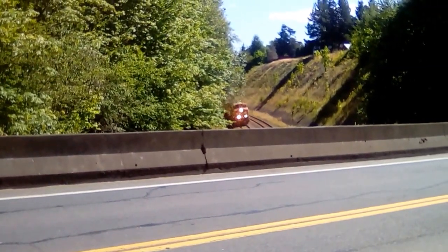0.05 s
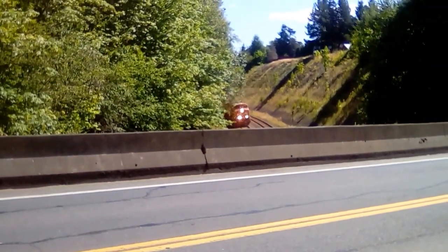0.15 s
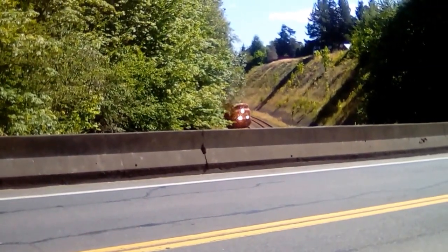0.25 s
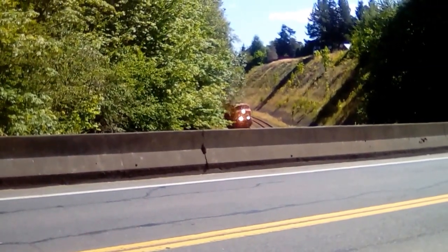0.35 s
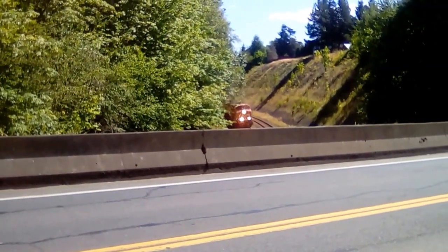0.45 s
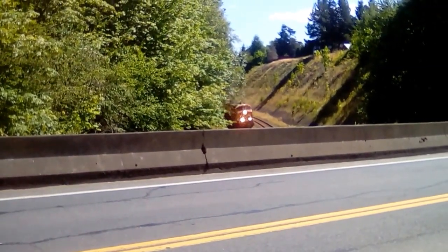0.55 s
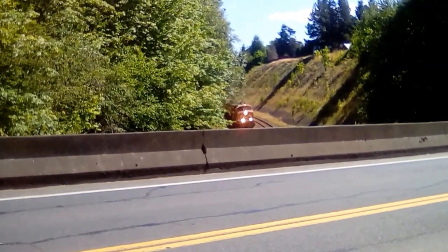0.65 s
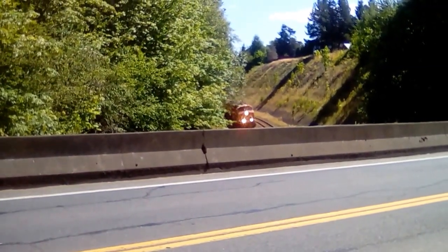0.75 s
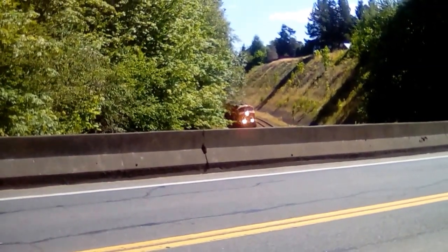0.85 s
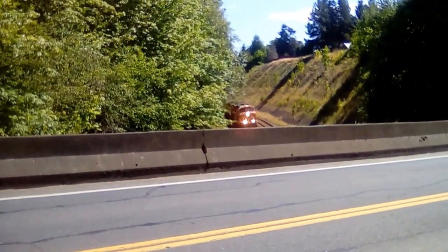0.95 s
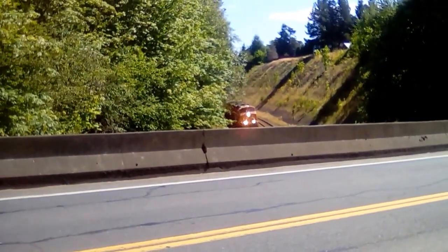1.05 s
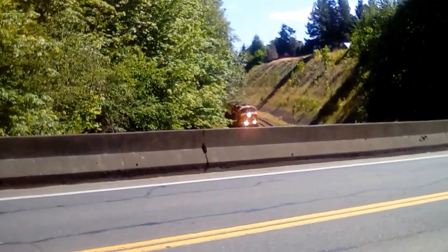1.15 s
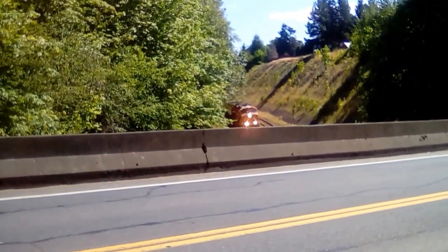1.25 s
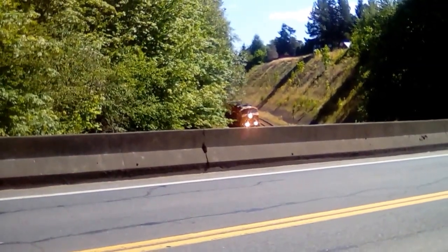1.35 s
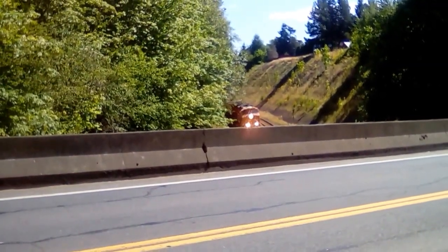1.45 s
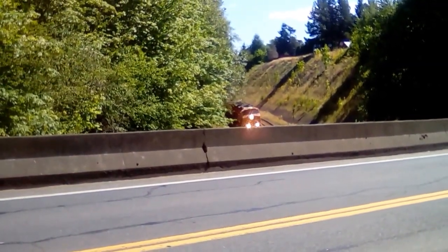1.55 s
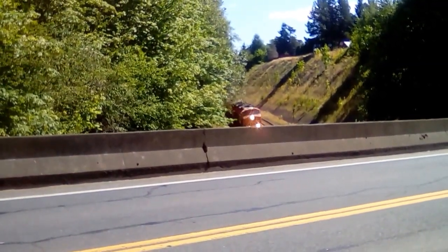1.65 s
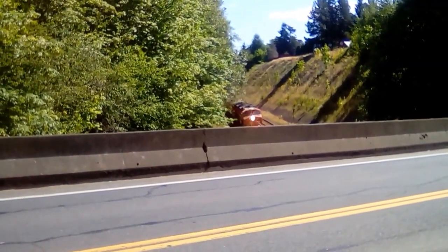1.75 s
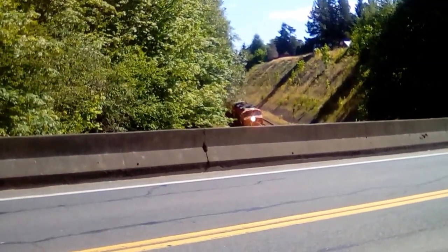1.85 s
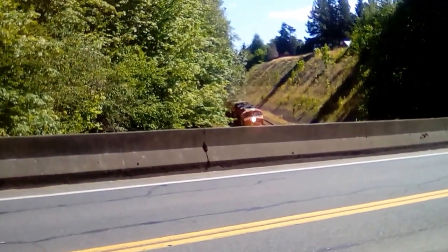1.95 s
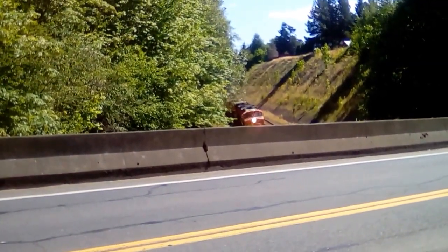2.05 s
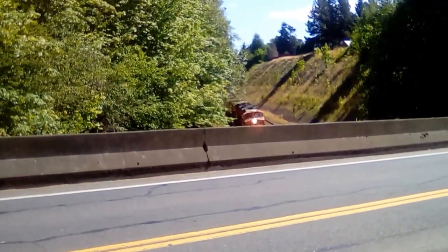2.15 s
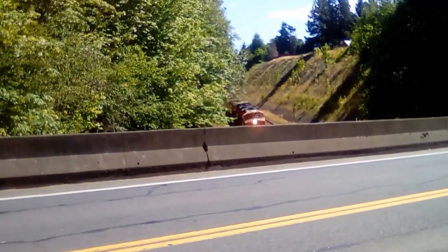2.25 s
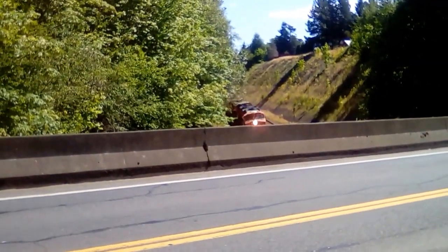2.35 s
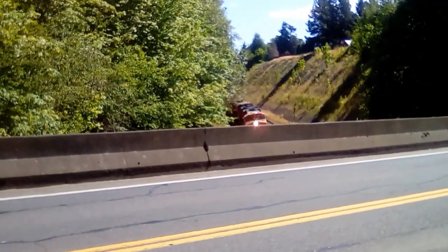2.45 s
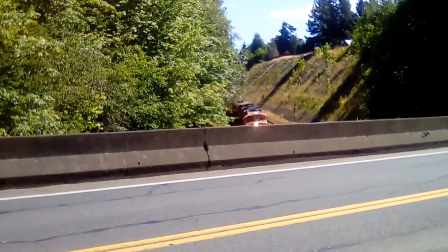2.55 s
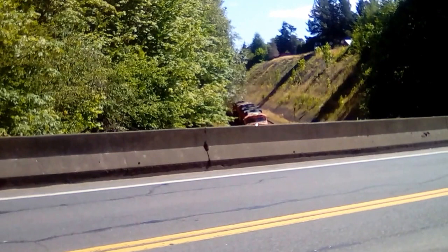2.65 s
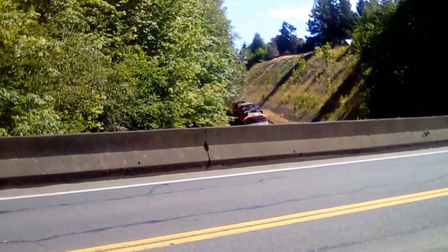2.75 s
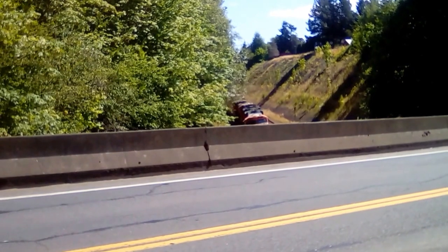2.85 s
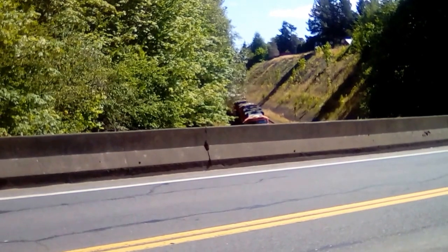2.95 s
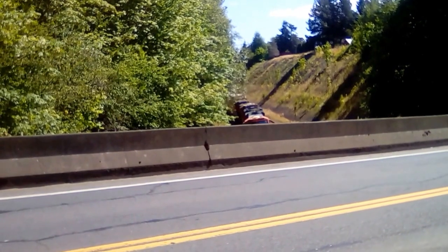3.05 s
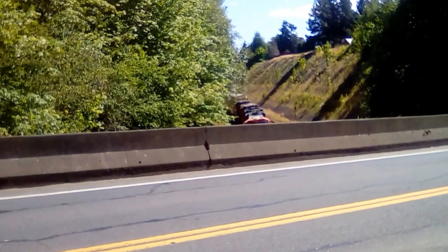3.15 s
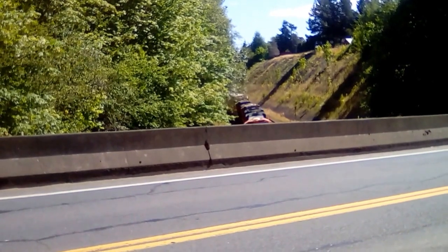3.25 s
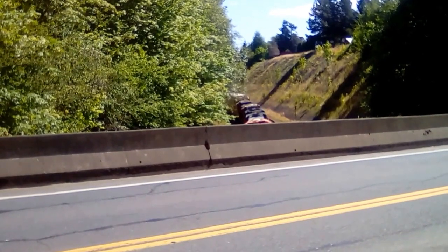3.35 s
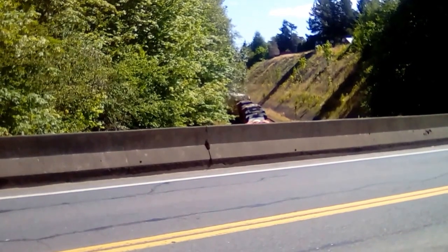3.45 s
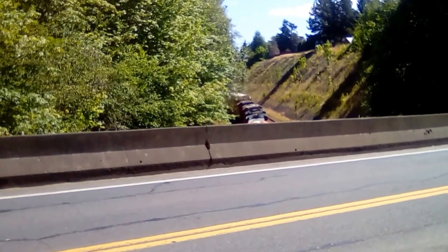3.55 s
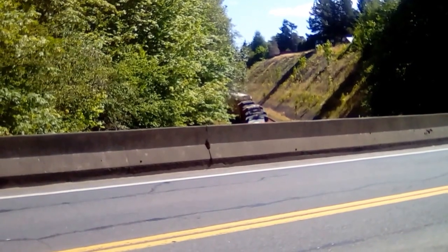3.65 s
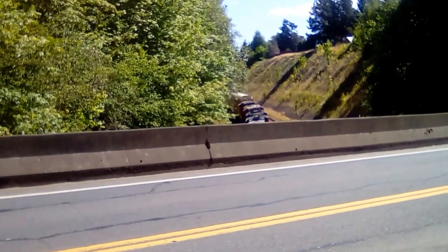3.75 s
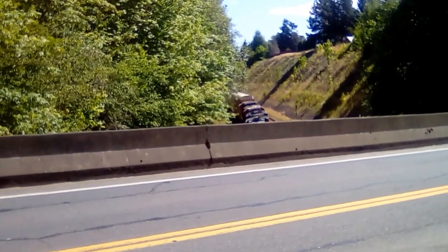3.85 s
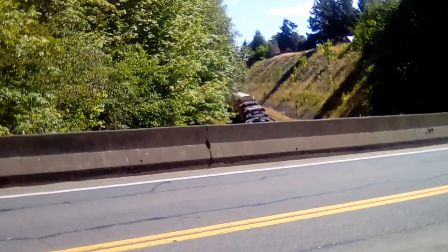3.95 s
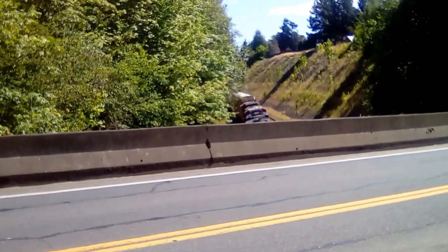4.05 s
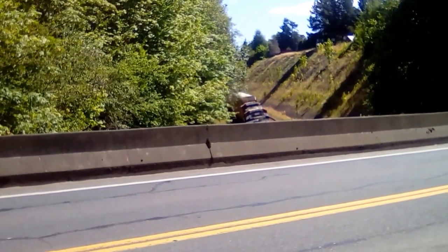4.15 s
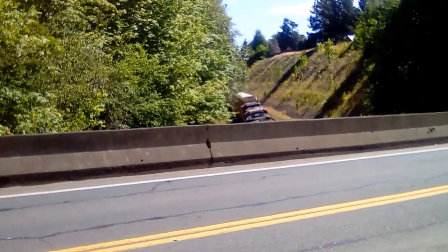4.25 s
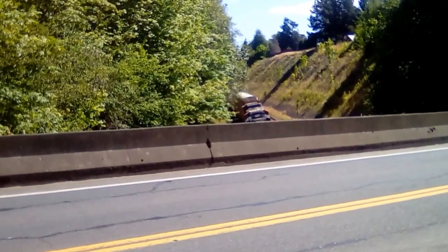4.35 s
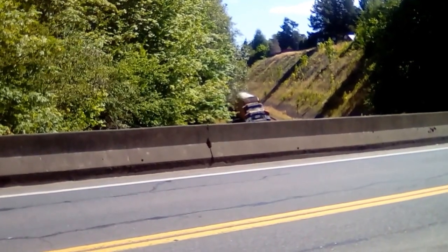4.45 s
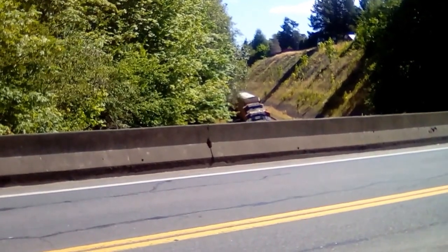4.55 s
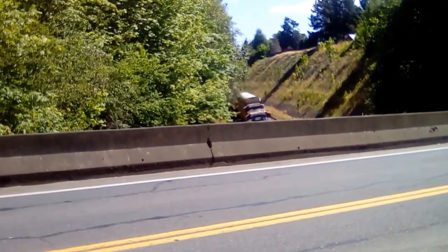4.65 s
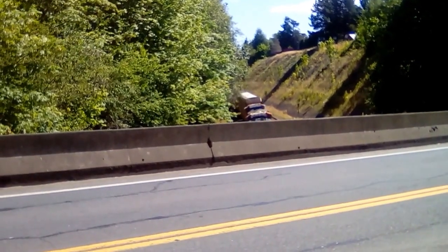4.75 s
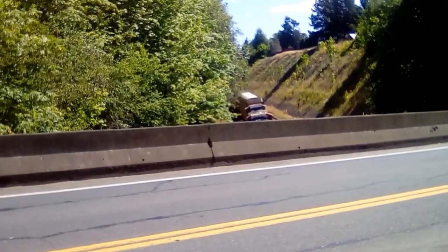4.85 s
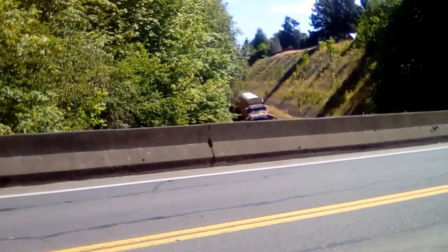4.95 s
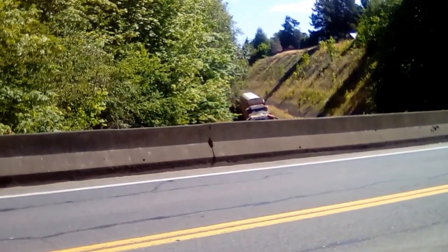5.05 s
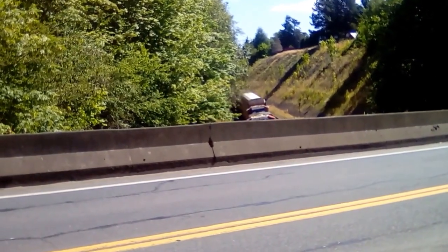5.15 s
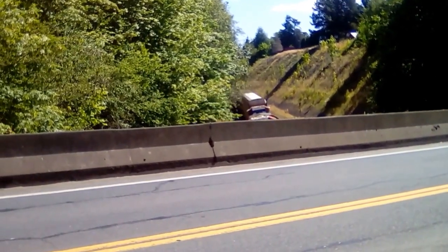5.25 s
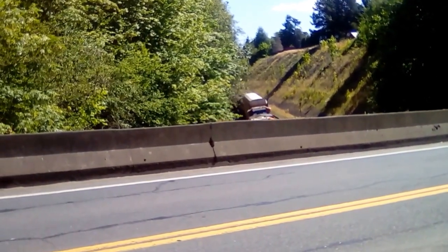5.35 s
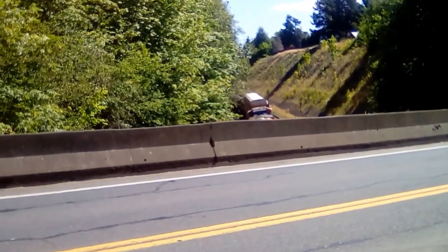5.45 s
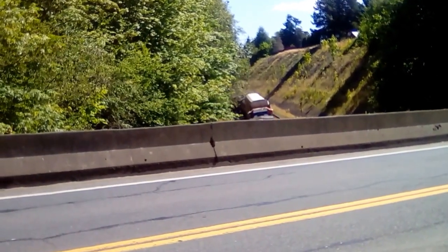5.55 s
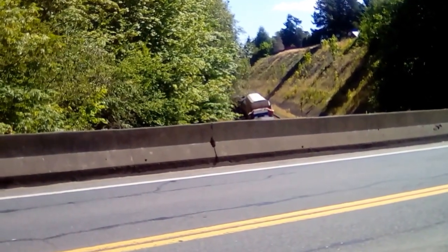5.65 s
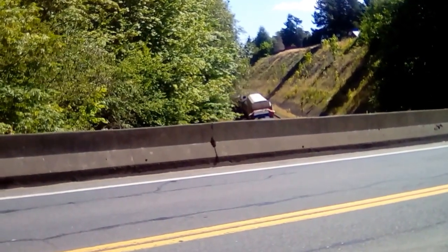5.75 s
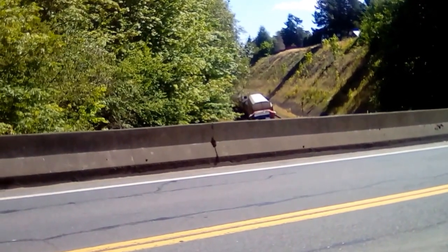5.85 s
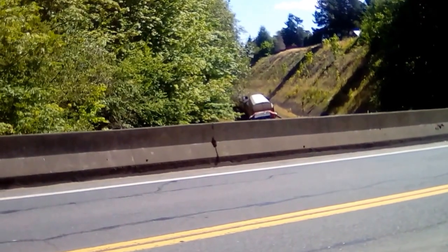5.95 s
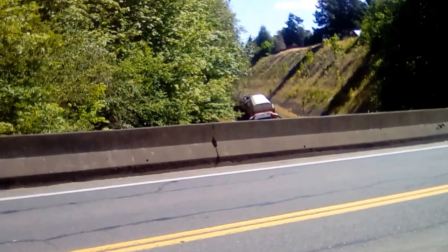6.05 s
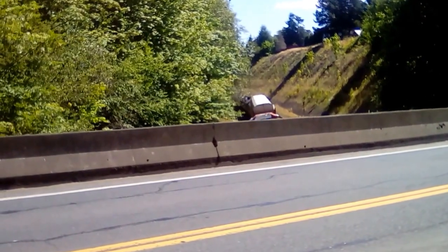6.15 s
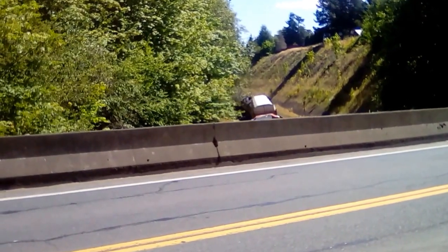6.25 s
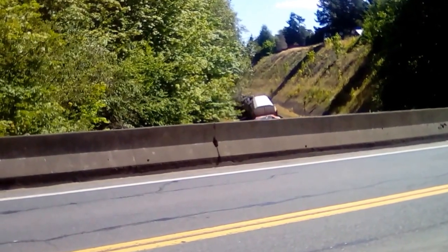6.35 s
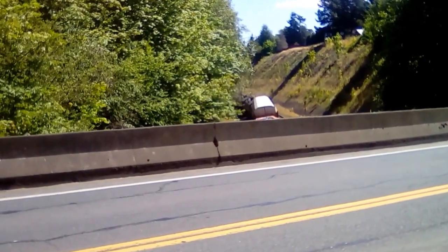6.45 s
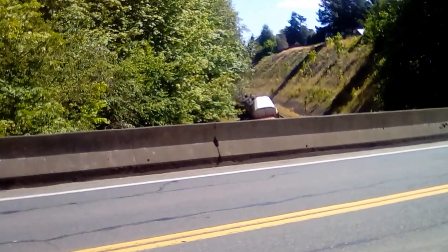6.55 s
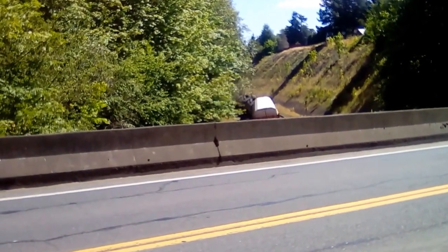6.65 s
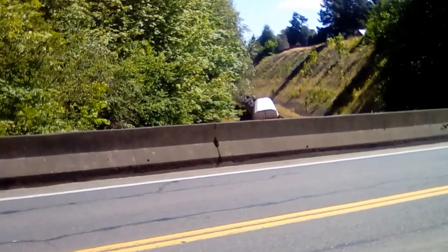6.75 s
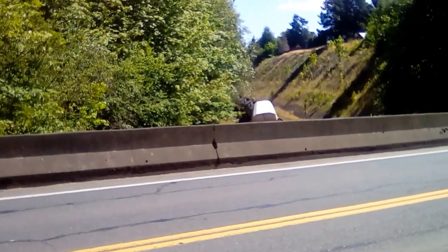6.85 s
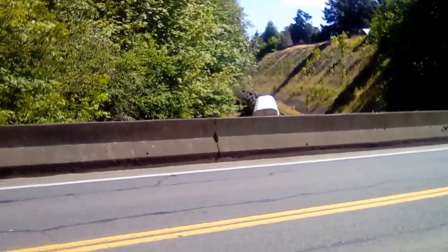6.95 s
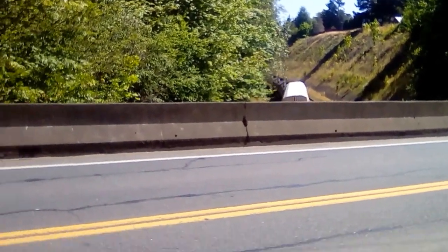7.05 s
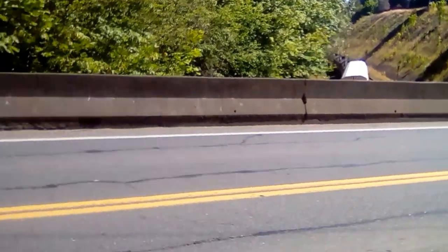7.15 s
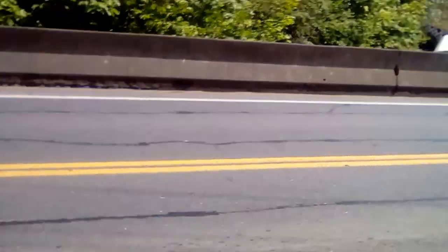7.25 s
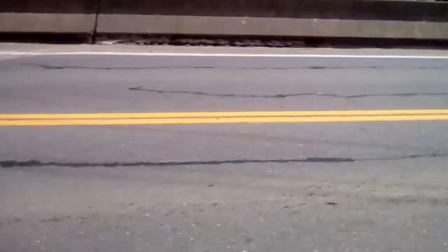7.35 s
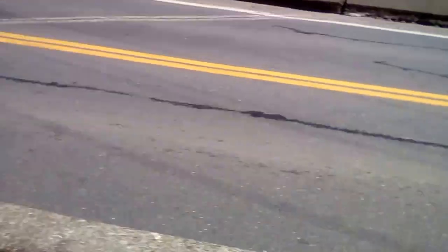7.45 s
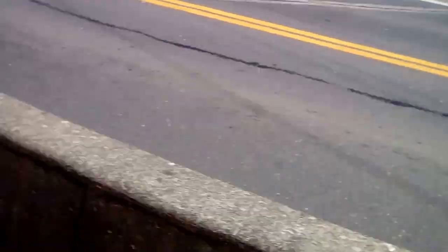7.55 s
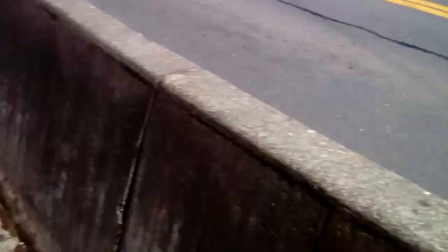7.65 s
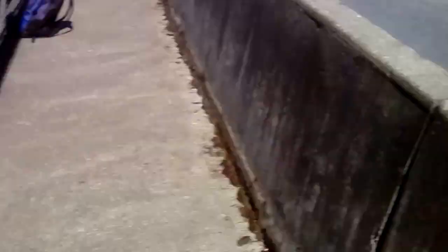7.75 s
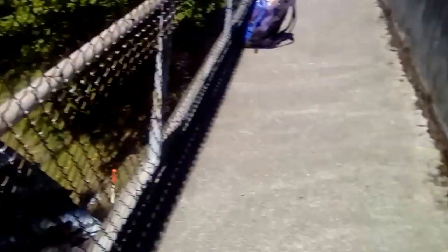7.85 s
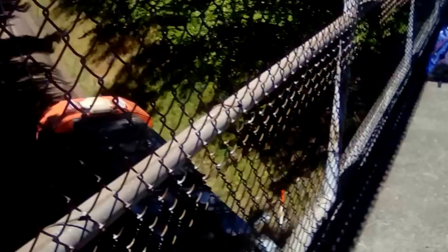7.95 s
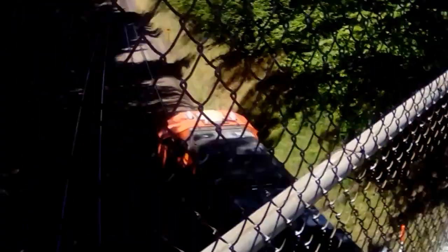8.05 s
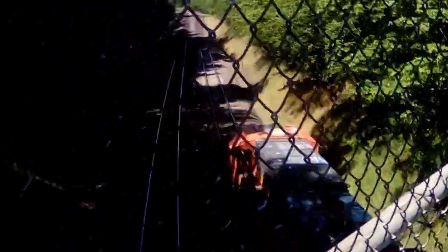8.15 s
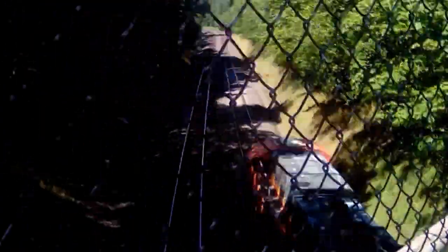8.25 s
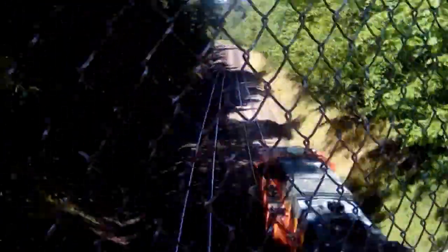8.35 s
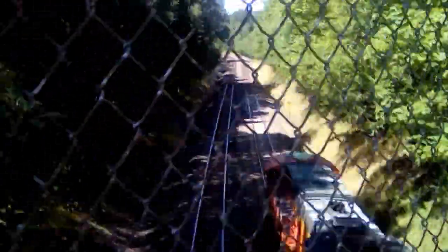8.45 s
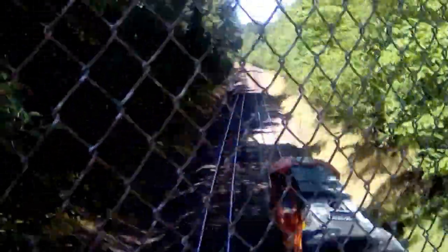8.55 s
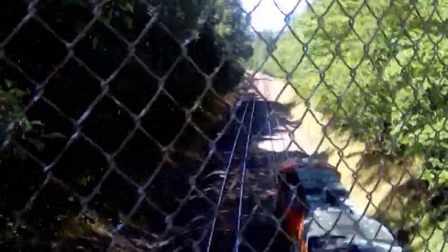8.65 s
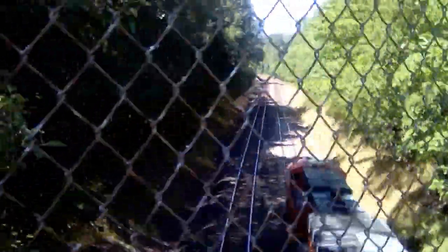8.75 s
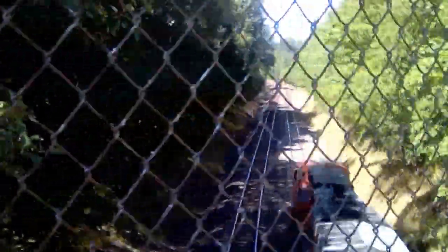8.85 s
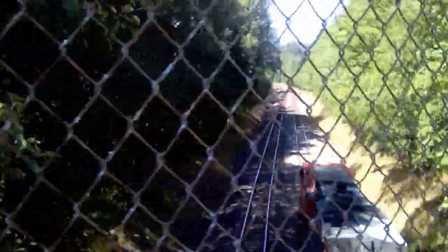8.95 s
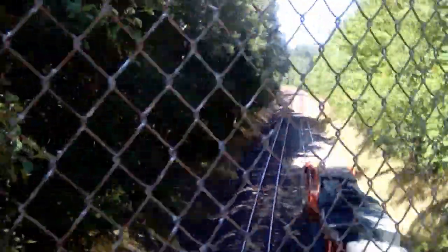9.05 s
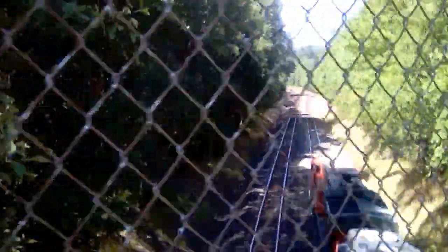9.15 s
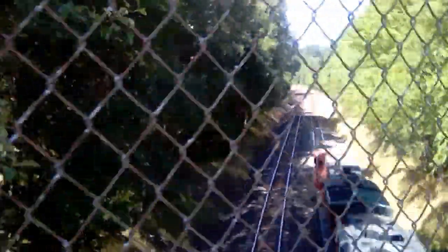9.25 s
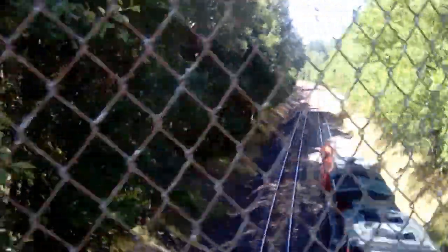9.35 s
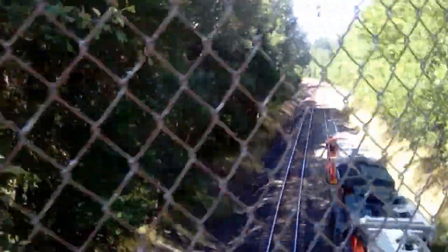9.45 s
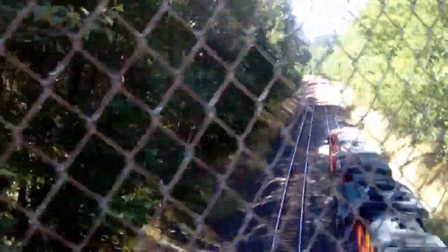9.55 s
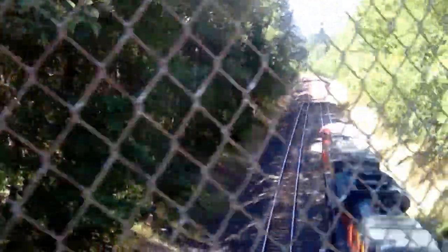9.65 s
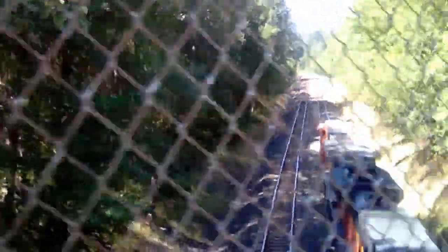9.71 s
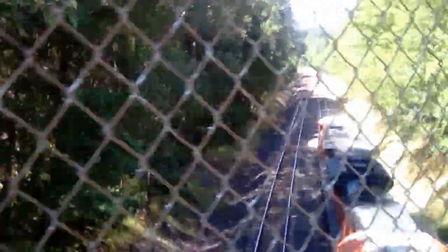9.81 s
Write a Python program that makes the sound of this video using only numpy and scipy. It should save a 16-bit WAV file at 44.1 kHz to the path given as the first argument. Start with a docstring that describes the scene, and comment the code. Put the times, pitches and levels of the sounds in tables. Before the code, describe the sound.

A distant engine rumble with ringing rails swells into a loud, distorted rush of throbbing diesels and steel wheels passing beneath a bridge.

```python
"""Diesel locomotives pull a freight train along a cutting and under a road bridge, heard from the bridge.
Engines are wavering sines on orders of one cycle rate plus puffing noise; roar and hiss are shaped noise.
Each part swells with nearness and changes level behind the deck; engine orders, fans and gears glide down.
Rails ring ahead of the wheels as resonant noise, overload ticks crackle, and a limiter clips the mono sum."""
import sys
import numpy as np
from scipy.fft import rfft, irfft, next_fast_len
from scipy.io import wavfile
from scipy.ndimage import uniform_filter1d, minimum_filter1d, map_coordinates

SR = 44100
rng = np.random.default_rng(int(sys.argv[2]) if len(sys.argv) > 2 else 0)


def unload_audio(sound):
    """Save the sound as a 16-bit wav file, at the path given as the first command line argument."""
    columns = np.transpose(np.atleast_2d(sound))
    # keep every value between -1 and 1, then stretch to whole-number steps
    steps = np.round(np.clip(columns, -1, 1) * 32767)
    wavfile.write(sys.argv[1], SR, steps.astype(np.int16))


N = 435708

CYCLE_HZ, ENGINE_PASS_S, ENGINE_NEAR_M = 8.76, 7.58, 11
FIRING_ORDER = 6
# Strong engine orders, lifted and cancelled by echoes of cutting and bridge, before trim:
# (time [s], level [dB])
ORDER_6_LEVEL = [(0.03, -45.5), (4.78, -43.7), (6.03, -27), (6.88, -35), (7.03, -24), (7.62, -40.0),
                 (7.73, -28.2), (8.08, -22), (8.22, -32), (9.83, -32)]
ORDER_9_LEVEL = [(0.03, -45.5), (2.27, -43.9), (5.38, -28.5), (6.28, -33), (6.48, -20.5), (7.33, -24),
                 (7.43, -14.5), (7.62, -15.5), (7.78, -30), (7.93, -15.5), (8.58, -24.5), (8.93, -19.0),
                 (9.43, -41.1), (9.83, -26)]
ORDER_15_LEVEL = [(0.03, -41.2), (2.93, -29.5), (4.38, -27), (5.18, -28.6), (5.83, -18.5), (6.03, -22.5),
                  (6.28, -16), (6.58, -19.8), (7.18, -13.5), (7.68, -26), (7.78, -17), (8.43, -12.5),
                  (8.68, -19.5), (9.38, -15), (9.58, -23.5), (9.83, -19.5)]
ORDER_TRIM_DB, THROB_TRIM_DB, EXHAUST_TRIM_DB = 0.45, -0.2, -1.85
# Weaker orders from unequal cylinders: (order [multiple of cycle rate], relative level [dB])
THROB_ORDERS = [(2, -15), (3, -16), (7, -32), (8, -21), (10, -11), (11, -23), (13, -2.5), (14, 1.5),
                (16, -11), (17, -9), (18, 2), (19, -2.5), (20, -2), (21, 1.5), (22, -9), (23, -6),
                (24, -18), (25, -10), (26, -4), (27, -12.5), (28, -19), (29, -11), (30, -6.5)]
# Engine noise spectra: (frequency [Hz], relative level [dB])
RUMBLE_SPECTRUM = [(15, -24), (30, -2.5), (45, -14), (65, -4), (90, 2.5), (115, 0.5), (150, -0.5),
                   (220, -40), (400, -80)]
EXHAUST_SPECTRUM = [(70, -50), (120, -11), (165, 0), (230, 2), (280, -4), (330, -14), (450, -23.5),
                    (900, -60)]
# Exhaust briefly stronger or weaker: (time [s], half length [s], lift [dB])
EXHAUST_SWELLS = [(0, .4, -2), (2.4, .9, 3), (4.6, .3, 1.5), (6.6, .45, 4), (9.3, .5, -1.5)]


def engine():
    """Strong low orders, a throb of weaker ones, rumble, and exhaust noise that puffs with the firings."""
    cycle = angle(CYCLE_HZ * doppler(ENGINE_PASS_S, ENGINE_NEAR_M))
    firing = FIRING_ORDER * cycle
    rumble_db = passing("rumble")
    exhaust_db = passing("exhaust") + lifts(EXHAUST_SWELLS)

    drone = 0
    for order, level in [(6, ORDER_6_LEVEL), (9, ORDER_9_LEVEL), (15, ORDER_15_LEVEL)]:
        order_db = curves(level)[0] + ORDER_TRIM_DB
        drone = drone + amp(order_db) * partial(order * cycle, scatter=0.051, rate=6.5)
    overtone = amp(rumble_db - 6) * partial(2 * firing, scatter=0.23, rate=3)

    throb = unit(sum(amp(db) * partial(order * cycle, scatter=0.45, rate=1.8) for order, db in THROB_ORDERS))
    puffs = 1 + 0.06 * np.sin(cycle) + 0.16 * np.sin(2 * cycle)
    puffs += 0.28 * np.sin(firing / 2) + 0.32 * np.sin(firing)
    exhaust = unit(puffs * rush(EXHAUST_SPECTRUM))

    orders = drone + overtone + amp(exhaust_db + THROB_TRIM_DB) * throb
    noise = amp(exhaust_db + EXHAUST_TRIM_DB) * exhaust + amp(rumble_db) * rush(RUMBLE_SPECTRUM)
    return orders + noise


GROWL_HZ = 557  # throaty resonance of the approaching engines
# Boom of the engine hood: (centre [Hz], width [Hz], relative level [dB])
HOOD_MODE = [(287, 90, 0)]
# Air from openings in the engine bodies facing the bridge:
# (time [s], half length [s], centre [Hz], level [dB])
AIR_GUSTS = [(7.72, .2, 345, -21.5), (8.9, .3, 470, -24.5)]


def growl():
    """Resonant noise: engine bodies growl from afar, boom from close by, and let out gusts of air."""
    throat = amp(passing("growl") + 1.3 * wobble(8)) * ringing([(GROWL_HZ, 125, 0)])
    boom = amp(passing("hood")) * ringing(HOOD_MODE)
    gusts = sum(amp(db) * swell(at_s, half_s) * ringing([(hz, 130, 0)]) for at_s, half_s, hz, db in AIR_GUSTS)
    return throat + boom + gusts


# Running-gear roar and steel-on-steel noise: (frequency [Hz], relative level [dB])
ROAR_SPECTRUM = [(150, -22), (280, -2), (350, -2), (500, -3), (700, -7), (900, -9.5), (1400, -12),
                 (1800, -14), (2600, -17.5), (5000, -61)]
HISS_SPECTRUM = [(400, -13.5), (900, -11), (1500, -8), (2200, -7.5), (2900, -6.5), (4000, -3.5),
                 (5200, -2.5), (6500, -0.5), (7150, -5.5), (8000, -15), (9000, -22.5), (11000, -34.5),
                 (13500, -51), (15700, -55)]
SIZZLE_SPECTRUM = [(7000, -20), (9000, 6), (10000, 3), (12000, -1), (13500, -9), (15700, -16)]
# Wheels scrape harder: (time [s], half length [s], lift [dB])
SCRAPES = [(7.36, 0.11, 3), (7.66, 0.14, 2), (8.66, .05, 4), (8.77, 0.044, 2.5), (8.93, 0.02, 2.4),
           (9.01, .012, 3.5), (9.19, 0.054, 2)]


def wheels():
    """Running gear roars; steel rolling on steel hisses with a slight flutter and brief scrapes."""
    flutter_db = 0.32 * wobble(30) + 0.47 * wobble(90)
    scrape_db = lifts(SCRAPES)
    roar_db = passing("roar") + 0.7 * scrape_db + flutter_db + 0.3 * wobble(25)
    hiss_db = passing("hiss") + scrape_db + flutter_db
    sizzle_db = passing("sizzle") + scrape_db + flutter_db
    roar = amp(roar_db) * rush(ROAR_SPECTRUM)
    hiss = amp(hiss_db) * rush(HISS_SPECTRUM)
    return roar + hiss + amp(sizzle_db) * rush(SIZZLE_SPECTRUM)


# Rail bending modes together with a steady narrow band near 1.25 kHz, waves far along the rail head, thin
# singing tone: # # (centre [Hz], width [Hz], relative level [dB])
BENDING_MODES = [(560, 220, -3), (1254, 72, 1.5), (1700, 74, -9), (2180, 66, -17)]
HEAD_MODES = [(6090, 240, 6), (6460, 130, 5), (7080, 310, -23)]
TONE_MODES = [(7096, 14, 0), (7120, 300, -11.5)]
# Rail head ringing: (time [s], level [dB])
HEAD_LEVEL = [(0, -54.5), (.8, -48), (3.3, -50.5), (4.3, -41.5), (5.6, -32.5), (6.5, -35), (7.5, -38.5),
              (8.25, -30), (9.1, -45), (9.88, -56)]
TONE_DB, TONE_PEAK_S, TONE_RISE_DB_PER_S, TONE_FALL_DB_PER_S = -34.5, 5.74, 8, 9


def rails():
    """Rails carry their resonances ahead of the train; the thin tone peaks before the train passes."""
    bending = amp(passing("rails") + 1.6 * wobble(7)) * ringing(BENDING_MODES)
    head = amp(curves(HEAD_LEVEL)[0] + 1.1 * wobble(7)) * ringing(HEAD_MODES)
    since_s = seconds() - TONE_PEAK_S
    tone_db = TONE_DB + np.minimum(TONE_RISE_DB_PER_S * since_s, -TONE_FALL_DB_PER_S * since_s)
    return bending + head + amp(tone_db) * ringing(TONE_MODES)


BLADE_HZ, FAN_PASS_S, FAN_NEAR_M = 415, 8.02, 8
MESH_HZ, GEAR_PASS_S, GEAR_NEAR_M = 987, 8.87, 8
# Fan partials: (multiple of blade rate, relative level [dB])
FAN_PARTIALS = [(2, -4.5), (3, 0), (4, -10), (6, -16)]
# Roof fans right beneath the microphone: (time [s], half length [s], lift [dB])
FAN_SURGES = [(8.08, .07, 9), (8.27, .06, 8.5), (8.41, .05, 7), (8.63, .08, 16.5), (8.82, 0.072, 9)]


def whines():
    """Roof fans sing in sines and traction gears whirr in narrow noise, gliding down as they pass below."""
    blade = angle(BLADE_HZ * doppler(FAN_PASS_S, FAN_NEAR_M))
    fan = sum(amp(db) * partial(k * blade, scatter=0.28, rate=30) for k, db in FAN_PARTIALS)
    whirr = gliding(MESH_HZ * doppler(GEAR_PASS_S, GEAR_NEAR_M), half_width_hz=24)
    return amp(passing("fans") + lifts(FAN_SURGES)) * fan + amp(passing("gears")) * whirr


CRACKLE_START_S, CRACKLE_END_S, CRACKLE_FADE_S = 8.1, 9.15, 0.15
CRACKLE_PER_S, CRACKLE_DB = 1100, -45
# Tick spectrum: (frequency [Hz], relative level [dB])
CRACKLE_SPECTRUM = [(5000, -20), (8500, 3), (11000, 4), (13500, -2), (15700, -8)]


def overload_crackle():
    """Sparse random ticks stand for overload, crackling in the top treble as the train passes."""
    ticks = (rng.random(N) < CRACKLE_PER_S / SR) * rng.standard_normal(N)
    corners_s = [CRACKLE_START_S, CRACKLE_START_S + CRACKLE_FADE_S / 2,
                 CRACKLE_END_S - CRACKLE_FADE_S, CRACKLE_END_S]
    window = np.interp(seconds(), corners_s, [0, 1, 1, 0])
    return amp(CRACKLE_DB) * window * coloured(ticks, CRACKLE_SPECTRUM)


# Recorder's hiss: (frequency [Hz], relative level [dB])
FLOOR_SPECTRUM = [(100, -10), (2000, 17.5), (8500, -10), (9500, -1), (12000, 10), (14300, 8), (15700, -2)]


def recorder_hiss():
    """Steady shaped noise of the recorder."""
    return amp(-57.0) * rush(FLOOR_SPECTRUM)


SPEED_M_PER_S, SOUND_M_PER_S = 19.3, 343


def track(pass_s, near_m):
    """Position along the track and distance from the microphone, in metres."""
    along_m = SPEED_M_PER_S * (seconds() - pass_s)
    return along_m, np.hypot(along_m, near_m)


def doppler(pass_s, near_m):
    """Pitch factor: high while a source comes, low as it leaves."""
    along_m, range_m = track(pass_s, near_m)
    return 1 / (1 + SPEED_M_PER_S / SOUND_M_PER_S * along_m / range_m)


# Deck begins to hide the locomotives, hides them most, lets them out
HIDE_S, HIDDEN_S, EMERGE_S = 6.39, 7.91, 8.255
# Pass-by per part, before trims and lifts: (level when nearest [dB], nearest at [s], nearest distance [m],
# loss in cutting [dB per 100 m], loss behind deck [dB], negative lifts)
PASS_BYS = { "rumble": (-17.5, 8, 14.5, 11, -0.5), "exhaust": (-16, 8, 18.5, 5.5, 8.5),
            "hood": (-26, 9, 21, 23, -2), "growl": (-39.5, 5.5, 29, 9.5, 1),
            "roar": (-20.8, 8.7, 13.2, 3.2, 1.2), "hiss": (-18.5, 8.25, 26.5, 11.5, 9.5),
            "sizzle": (-48.5, 6.0, 24, 5, 8), "rails": (-31, 8.5, 25.5, 2, 3),
            "fans": (-34.5, 8.5, 7, 0.5, 3.5), "gears": (-28, 8.8, 6, 6.5, 5), }


def passing(part):
    """Level in dB of a part of the train: spreading, loss along the cutting, shadow of the deck."""
    near_db, pass_s, near_m, loss_db, deck_db = PASS_BYS[part]
    range_m = track(pass_s, near_m)[1]
    spreading_db = 20 * np.log10(range_m / near_m)
    cutting_db = loss_db * (range_m - near_m) / 100
    hidden = np.interp(seconds(), [HIDE_S, HIDDEN_S, EMERGE_S], [0, 1, 0])
    return near_db - spreading_db - cutting_db - deck_db * hidden


def swell(at_s, half_s):
    """A bell-shaped rise and fall of height 1."""
    return np.exp(-((seconds() - at_s) / half_s) ** 2)


def lifts(rows):
    """The dB that a table of brief swells adds."""
    return sum(db * swell(at_s, half_s) for at_s, half_s, db in rows)


def seconds():
    """The time of every sample."""
    return np.arange(N) / SR


def curves(rows):
    """One value per sample for each column after the time."""
    time_s, *columns = np.transpose(rows)
    return [np.interp(seconds(), time_s, column) for column in columns]


def wobble(rate):
    """A smooth random curve, rate knots a second."""
    coarse = np.arange(0, N + 64, 64)
    knots = rng.standard_normal(4000)
    curve = map_coordinates(knots, [coarse * rate / SR], mode="mirror")
    return np.interp(np.arange(N), coarse, curve)


def angle(hz):
    """Running phase of a rate curve."""
    return 2 * np.pi * np.cumsum(hz) / SR


def partial(phase, scatter, rate):
    """A sine of rms about 1 that wavers randomly in strength and phase."""
    phase = phase + rng.uniform(0, 2 * np.pi)
    in_phase = (1 + scatter * wobble(rate)) * np.sin(phase)
    quadrature = scatter * wobble(rate) * np.cos(phase)
    return (in_phase + quadrature) * np.sqrt(2 / (1 + 2 * scatter ** 2))


def ringing(modes):
    """Random noise through resonances (centre [Hz], width [Hz], relative level [dB]), at rms 1."""
    def response(hz):
        return sum(amp(db) / (1 + ((hz - centre) / (width * 0.81)) ** 2) for centre, width, db in modes)
    return unit(filtered(rng.standard_normal(N), response))


def gliding(centre_hz, half_width_hz):
    """A narrow band of noise, rms about 1, that follows a centre curve."""
    phase = angle(centre_hz)
    band = [(0, half_width_hz * 2, 0)]
    return ringing(band) * np.cos(phase) + ringing(band) * np.sin(phase)


def rush(spectrum):
    """Coloured noise of rms 1."""
    return coloured(rng.standard_normal(N), spectrum)


def coloured(x, spectrum):
    """x shaped by (frequency [Hz], level [dB]) points, at rms 1."""
    point_hz, point_db = np.transpose(spectrum)

    def response(hz):
        return amp(np.interp(np.log(hz + 1), np.log(point_hz), point_db))
    return unit(filtered(x, response))


def filtered(x, response):
    """x times a response of frequency."""
    size = next_fast_len(N + SR // 2)
    return irfft(rfft(x, size) * response(np.fft.rfftfreq(size, 1 / SR)), size)[..., :N]


def unit(x):
    """Scale to rms 1."""
    return x / np.sqrt(np.mean(x ** 2) + 1e-20)


def amp(db):
    """Decibels to gain."""
    return 10 ** (np.asarray(db) / 20)


def scene():
    """All sounds, the recorder's hiss and overload crackle are summed to mono, in two equal channels."""
    train = engine() + growl() + wheels() + rails() + whines()
    mono = train + overload_crackle() + recorder_hiss()
    return np.array([mono, mono])


LIMIT, CEILING, TOP_HZ = 0.635, 0.7, 15720


def record(dry):
    """A limiter holds the broad swings down; hiss riding on their crests clips; the top is cut off."""
    swing = np.abs(uniform_filter1d(dry, size=5))
    needed = np.minimum(1, LIMIT / (swing + 1e-9))
    gain = uniform_filter1d(minimum_filter1d(needed, size=261), size=261)
    clipped = np.clip(dry * gain, -CEILING, CEILING)
    return filtered(clipped, lambda hz: hz < TOP_HZ)


dry = scene()
out = record(dry)
unload_audio(out)
```